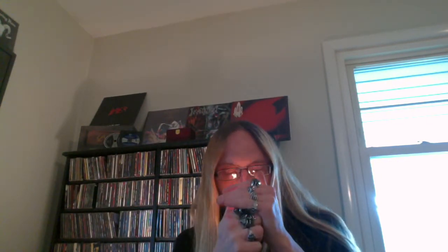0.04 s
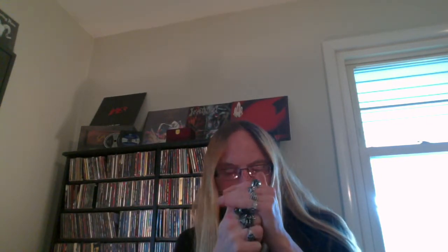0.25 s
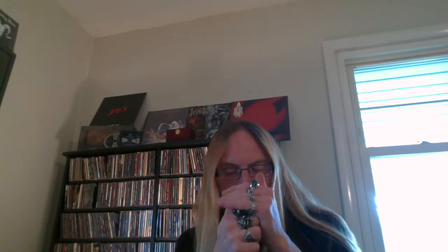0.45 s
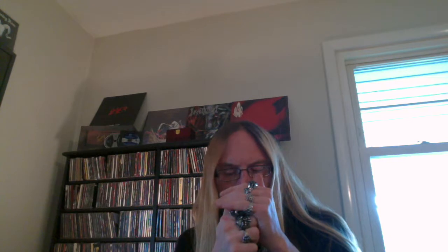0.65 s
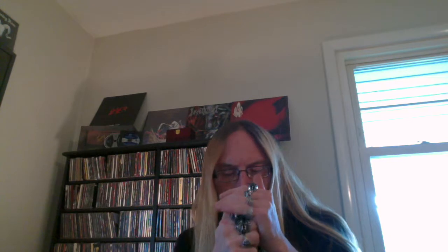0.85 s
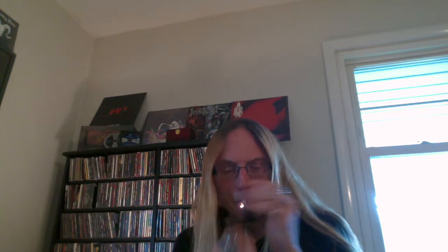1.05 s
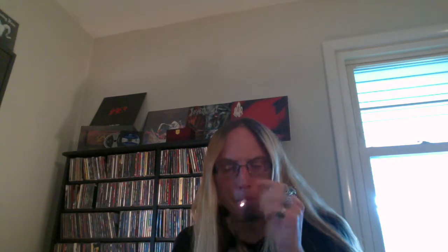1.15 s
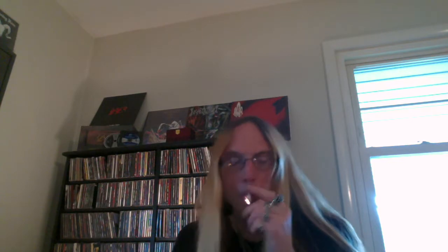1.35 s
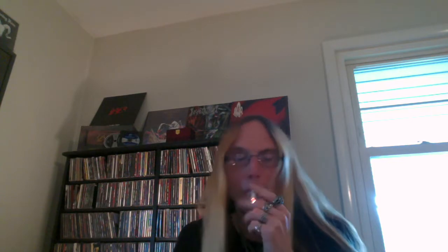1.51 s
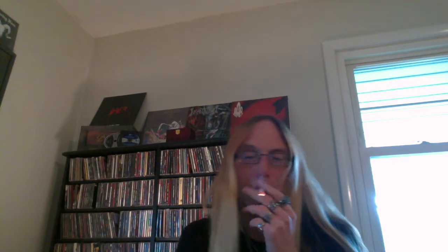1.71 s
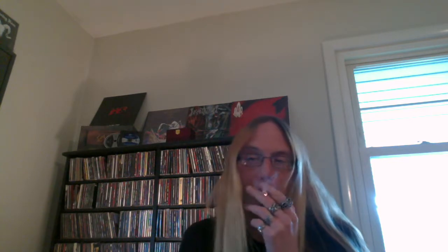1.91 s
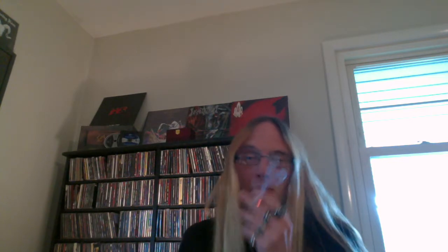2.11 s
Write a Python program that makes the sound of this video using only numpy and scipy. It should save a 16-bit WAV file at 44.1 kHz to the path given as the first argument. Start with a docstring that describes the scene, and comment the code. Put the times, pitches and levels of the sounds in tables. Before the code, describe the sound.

Quiet humming room, tiny metallic ticks and a short squeaky scrape, then a hard lighter clack with rapid rattling contacts, a short room ring and soft desk bumps, heard close on a laptop microphone.

```python
"""A metal lighter snaps shut and clatters on a desk, close to a laptop microphone in a small room.
First the coloured-noise tail of an earlier strike fades over faintly humming room tone; then a finger ring
ticks (damped sines with noise) and scrapes (grainy noise) on the case. At 1.5 s quick contacts knock the desk,
crack and ping the case and ring on in the room; soft desk bumps and two last faint ticks follow.
The recorder turns its gain down under the loud clack and clips."""
import sys
import numpy as np
from scipy import signal
from scipy.fft import rfft, irfft, next_fast_len
from scipy.io import wavfile
from scipy.ndimage import map_coordinates

SR = 44100
rng = np.random.default_rng(int(sys.argv[2]) if len(sys.argv) > 2 else 0)


def voltage_ratio(level):
    """Linear amplitude factor for a level in decibels (scalar or array-like)."""
    return 10 ** (np.asarray(level, float) / 20)


def dump(signal):
    """Clip the signal to [-1, 1] and save it as 16-bit WAV at the path in sys.argv[1]."""
    limited = np.clip(np.atleast_2d(signal).T, -1, 1)
    pcm = np.round(limited * 32767).astype(np.int16)
    wavfile.write(sys.argv[1], SR, pcm)


N = 95564
T = np.arange(N) / SR  # time, s

# spectrum of metal cracking against metal: hz, level_db
CRACK_COLOUR = [(300, -29), (1000, -7), (2000, -8), (4500, -8.5), (7000, -3), (8500, -7.5), (10000, -4.5),
                (15000, -27.5)]


def unit(x):
    """Scales a signal to rms 1."""
    return x / np.sqrt(np.mean(x ** 2) + 1e-20)


def along(points, at):
    """Joins (x, dB) points by straight lines; -120 dB outside them."""
    return np.interp(at, *np.transpose(points), left=-120, right=-120)


def colour(x, points):
    """Filters x by a (Hz, dB) spectrum read on log frequency."""
    size = next_fast_len(len(x) + 8192)
    hz, db = np.transpose(points)
    bin_hz = np.fft.rfftfreq(size, 1 / SR)
    gain = voltage_ratio(np.interp(np.log(bin_hz + 1), np.log(hz), db))
    return irfft(rfft(x, size) * gain, size)[:len(x)]


def noise(points, count=N):
    """Coloured noise of rms 1."""
    return unit(colour(rng.standard_normal(count), points))


def wobble(rate):
    """A smooth random curve with rate knots a second."""
    return map_coordinates(rng.standard_normal(N // 50), [T * rate])


def ringing(modes, t, spread_db=0):
    """Sums damped sines (Hz, dB, t60 s), their levels scattered at random by spread_db."""
    hz, db, t60_s = np.transpose(modes)[:, :, None]
    level_db = db + spread_db * rng.standard_normal(db.shape) - 60 * t / t60_s
    return np.sum(voltage_ratio(level_db) * np.sin(2 * np.pi * hz * t), 0)


def add(track, s, sound):
    """Mixes a sound into the track from s seconds on."""
    rest = track[round(s * SR):]
    rest[:len(sound)] += sound[:len(rest)]


def room(x):
    """Convolves with a fresh diffuse tail of noise, each frequency dying at its own speed."""
    # decay time of the small room: hz, t60_s
    room_decay = [(100, .6), (300, 0.49), (1000, 0.38), (3000, 0.35), (7000, 0.3), (12000, 0.23)]
    # spectrum of its reverberation: hz, level_db
    room_colour = [(60, -14.5), (200, -7.5), (500, 2.5), (1000, 0), (2500, 5), (5000, 0.5), (8000, -2.5),
                   (14000, -0.5)]
    delay_s = 0.0054
    bin_hz, t, bins = signal.stft(rng.standard_normal(SR), SR, nperseg=256)
    t60_s = np.interp(bin_hz, *np.transpose(room_decay))
    tail = signal.istft(bins * voltage_ratio(-60 * t / t60_s[:, None]), SR, nperseg=256)[1]
    tail = np.pad(tail / np.linalg.norm(tail), (round(delay_s * SR), 0))
    return colour(signal.fftconvolve(x, tail), room_colour)[:SR]


def earlier_strike():
    """The tail of a strike before the start: coloured noise dying exponentially."""
    # spectrum of the tail: hz, level_db
    strike_colour = [(710, -39), (1200, -20), (1700, -10), (1850, -7), (2490, -6.5), (2900, -26),
                     (3460, -9.5), (4290, -12), (5550, -1.5), (7400, -7), (8040, -25), (8460, -12.5),
                     (10600, -15.5), (14000, -41)]
    start_db, t60_s = -45, 0.3
    return noise(strike_colour) * voltage_ratio(start_db - 60 * T / t60_s)


def room_tone():
    """Broad hum and a lumpy low rumble of drifting level, with faint unsteady mains and fan lines."""
    # spectrum of the hum: hz, level_db
    hum_colour = [(35, -35), (60, -12), (109, -2.5), (185, -5.5), (321, -11.5), (508, -15.5), (544, -11.5),
                  (610, -17.5), (767, -9.5), (944, -18.5), (1840, -19), (2010, -23), (5920, -31),
                  (14500, -39)]
    # spectrum of the low rumble: hz, level_db
    rumble_colour = [(53, -37.5), (90, -4.5), (238, -3), (300, -6.5), (324, -22), (400, -13), (520, -41),
                     (880, -120)]
    # course of the hum's level, before its random drift: time_s, level_db
    hum_level = [(0, -59.5), (.3, -64.5), (.53, -64.5), (.62, -67.5), (1.05, -70), (1.15, -63), (1.45, -66),
                 (2.0, -58.5), (2.17, -62.5)]
    # mains and fan lines, before their random drift: hz, rms_db
    lines = [(119, -83.5), (240, -76.5), (762, -83.5)]
    lumps = voltage_ratio(1.5 * wobble(45))
    rumble = voltage_ratio(-6) * unit(noise(rumble_colour) * lumps)  # 6 dB under the hum
    out = (noise(hum_colour) + rumble) * voltage_ratio(along(hum_level, T) + 1.2 * wobble(4.7))
    for hz, db in lines:
        level = np.sqrt(2) * voltage_ratio(db + 2.5 * wobble(9))
        phase = 2 * np.pi * hz * T + 0.7 * wobble(6)
        out += level * np.sin(phase)
    return out


def finger_ring():
    """A ring touches the case: ticks are damped sines with noise, the scrape two bands of grainy noise."""
    # ticks: start_s, level_db, pitch_hz
    ticks = [(0.904, -60, 9300), (0.921, -57, 7370), (1.047, -54.5, 7300), (1.1973, -45.5, 7200),
             (1.991, -70, 9150), (2.035, -75, 9400)]
    # upper squeak of the scrape: time_s, level_db
    squeak_level = [(1.07, -97), (1.086, -69.5), (1.13, -55), (1.154, -68), (1.162, -60), (1.195, -82)]
    # body of the scrape: time_s, level_db
    body_level = [(1.105, -91), (1.123, -62), (1.127, -48.5), (1.189, -77.5), (1.192, -74)]
    # spectrum of the squeak: hz, level_db
    squeak_colour = [(4710, -66), (8000, -30), (8550, -8), (9600, -2), (10700, -11.5), (11500, -46),
                     (13000, -55)]
    # spectrum of the body: hz, level_db
    body_colour = [(1470, -37), (2500, -12), (3220, -10), (3510, -3), (3700, -3.5), (4680, -16),
                   (5940, 1.5), (6620, 13), (8200, -18), (10700, -39), (18000, -120)]
    attack_s, t60_s, crack_db, room_db = 0.00039, 0.012, -5.5, -6
    out, t = np.zeros(N), T[:SR // 10]
    for s, db, hz in ticks:
        envelope = (1 - np.exp(-t / attack_s)) * voltage_ratio(-60 * t / t60_s)
        crack = voltage_ratio(crack_db) * noise(CRACK_COLOUR, count=len(t))
        tick = envelope * (np.sin(2 * np.pi * hz * t) + crack)
        add(out, s, voltage_ratio(db) * tick)
        add(out, s, voltage_ratio(db + room_db) * room(tick))
    grain = voltage_ratio(-0.5 * wobble(250))  # both bands share the grain
    squeak = unit(grain * noise(squeak_colour)) * voltage_ratio(along(squeak_level, T))
    body = unit(grain * noise(body_colour)) * voltage_ratio(along(body_level, T))
    return out + squeak + body


def clack():
    """Each contact knocks the desk, cracks and pings the case, feeds the long ringing and fills the room."""
    # contacts, the third (1.5173 s) a strong echo of the second off the desk; knock and ring levels add to the
    # row's: start_s, level_db, knock_db, ring_db, ping_hz, knock_hz
    contacts = [(1.5033, -8.5, 0.5, -37, 10750, 940), (1.5142, 13, -14, -12.5, 6830, 1395),
                (1.5173, -3, 6, -31, 10630, 1834), (1.5214, 0, -17.5, -27.5, 6750, 1299),
                (1.5748, 2, -21, -33.5, 8945, 1410), (1.583, 6.5, -7, -21.5, 6960, 1056),
                (1.6134, 0, -9.5, -16, 8520, 1844)]
    # modes of the desk top: pitch_ratio to the knock's, level_db, t60_s
    desk_modes = [(1, -2, 0.036), (1.22, -10, 0.031), (1.9, -14, 0.023)]
    # long ringing of desk and case, one column each: pitch_hz
    mode_hz = [170, 284, 492, 597, 718, 794, 1011, 1154, 1244, 1521, 1567, 1782, 1915, 2275, 2488, 2664,
               3085, 3540, 4008, 4500]
    # level_db of each mode
    mode_db = [-27, -14, -10, -18, -18, -12, 2, -1, -2, -7, -5, -7, -2, -8, -7, 0, -3, -9, -10, -14]
    # t60_s of each mode
    mode_t60_s = [.62, .58, .46, .65, .38, .53, .31, .37, .33, .36, .36, .33, .36, .45, .34, .38, .37, .38,
                  .38, .39]
    ping_db, ping_t60_s, crack_t60_s = -1, 0.007, 0.015
    crack_lag_s, ring_attack_s, ring_spread_db = 0.0005, 0.03, 1.5
    ping_share, feed_t60_s, room_db = 0.46, 0.014, 6  # what the room gets of the ping, and for how long
    out, t = np.zeros(N), T[:SR]
    long_modes = np.column_stack([mode_hz, mode_db, mode_t60_s])
    for s, db, knock_db, ring_db, ping_hz, knock_hz in contacts:
        crack = noise(CRACK_COLOUR, count=SR) * voltage_ratio(-60 * t / crack_t60_s) / 2
        ping = ringing([(ping_hz, ping_db, ping_t60_s)], t)
        knock = voltage_ratio(knock_db) * ringing(np.multiply(desk_modes, [knock_hz, 1, 1]), t)
        swell = 1 - np.exp(-t / ring_attack_s)
        ring = voltage_ratio(ring_db) * ringing(long_modes, t, ring_spread_db) * swell
        feed = (knock + crack + ping_share * ping) * voltage_ratio(-60 * t / feed_t60_s)
        reverb = voltage_ratio(room_db) * room(feed[:SR // 10])
        add(out, s, voltage_ratio(db) * (knock + ring + reverb))
        add(out, s + crack_lag_s, voltage_ratio(db) * (crack + ping))
    return out


def desk_bumps():
    """Soft bumps on the desk: short damped sines that swing negative first."""
    # bumps: start_s, level_db, pitch_hz
    bumps = [(1.934, -38.5, 227), (2.147, -41.5, 261.7)]
    out = np.zeros(N)
    for s, db, hz in bumps:
        add(out, s, -ringing([(hz, db, 0.018)], T[:SR // 10]))  # t60 18 ms
    return out


def scene():
    """Mixes all sources at one microphone."""
    mix = earlier_strike() + room_tone() + finger_ring() + clack() + desk_bumps()
    return mix[None]


def roll_off(x):
    """The treble ends steeply here."""
    return signal.sosfilt(signal.butter(12, 16090, fs=SR, output="sos"), x)


def record(dry):
    """Gain control follows the loudness and lets go slowly; then band limits and clipping at full scale."""
    knee_db, squeeze = -17.5, 0.74  # share of the excess over the knee that is taken away
    smooth_s, release_db_per_s = 0.039, 78
    smooth = smooth_s * SR
    power = signal.lfilter([1], [1 + smooth, -smooth], dry[0] ** 2)
    level_db = 10 * np.log10(np.abs(power) + 1e-12)
    # hold each peak, sinking at the release rate
    release_db = release_db_per_s * T
    held_db = np.maximum.accumulate(level_db + release_db) - release_db
    x = dry[0] * voltage_ratio(-squeeze * np.maximum(held_db - knee_db, 0))
    bass_hz, top_hz = 75, 15900
    x = signal.lfilter(*signal.butter(2, bass_hz, 'high', fs=SR), x)
    x = signal.sosfilt(signal.ellip(10, 0.5, 70, top_hz, fs=SR, output='sos'), x)
    return roll_off(np.clip(x, -1, 1)[None])


dry = scene()
out = record(dry)
dump(out)
```